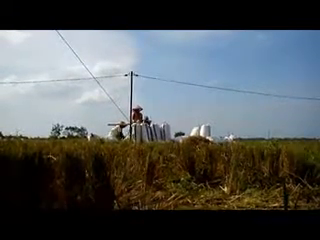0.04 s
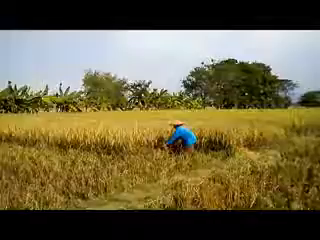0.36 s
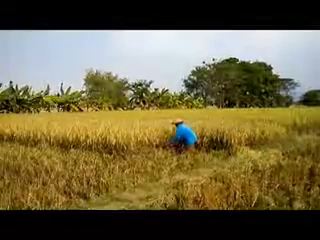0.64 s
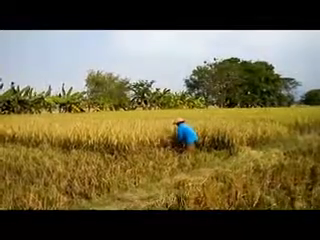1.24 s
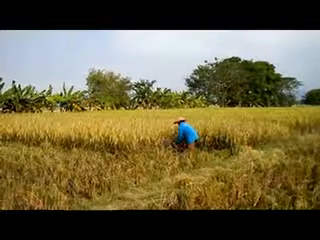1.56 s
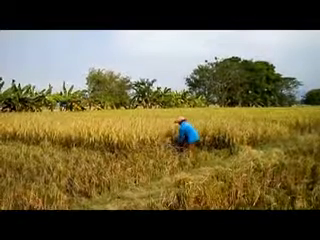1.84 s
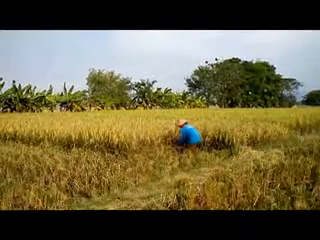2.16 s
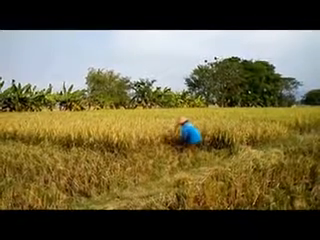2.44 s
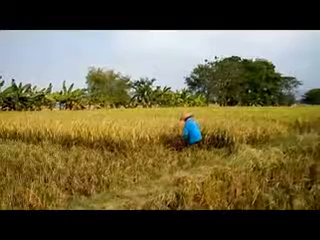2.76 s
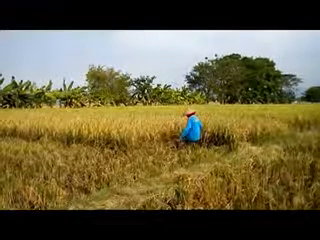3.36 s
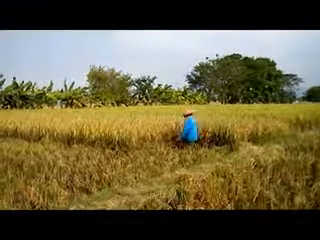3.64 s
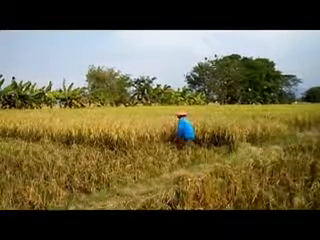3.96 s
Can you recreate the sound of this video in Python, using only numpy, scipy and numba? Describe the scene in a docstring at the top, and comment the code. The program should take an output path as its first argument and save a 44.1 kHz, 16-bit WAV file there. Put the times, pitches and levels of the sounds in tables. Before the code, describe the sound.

Gusts of wind rumble and thump directly on the microphone, outdoors in a ripe rice field. The wind starts light, then suddenly turns strong, with a soft hiss of dry stalks swelling behind it and one brief click.

```python
"""Wind over a ripe rice field.

A bare microphone stands first in a calmer spot, with two faint knocks far off, then in the open crop.
Gusts buffet it: large eddies rumble, small ones flutter, sharp ones thump, and the hardest gust hoots.
Dry husks and stalks brush together in slow swells, one stalk snaps and a far tone sounds at the end.
A limiter holds down the gusts; the sound drops out twice and breaks once with a click."""
import sys
import numpy as np
from scipy import signal
from scipy.fft import rfft, irfft
from scipy.io import wavfile
from scipy.ndimage import uniform_filter1d, map_coordinates
from numba import njit

SR = 44100
rng = np.random.default_rng(int(sys.argv[2]) if len(sys.argv) > 2 else 0)


def inscribe(sig):
    """Save sig as 16-bit PCM at rate SR to the path in sys.argv[1].

    A 1-D sig is mono; a 2-D sig holds one channel per row.
    Samples are clipped to [-1, 1] before scaling.
    """
    pcm = np.round(np.clip(np.atleast_2d(sig).T, -1, 1) * 32767)
    wavfile.write(sys.argv[1], SR, pcm.astype(np.int16))


N = 176400

# Wind, distant air and hiss at the calmer spot. Each row: frequency in Hz, relative level in dB.
CALM_WIND_COLOUR = [(20, -6), (50, 5.5), (105, 5), (160, -5.5), (220, -17.5), (300, -26), (700, -56)]
CALM_AIR_COLOUR = [(300, -7), (550, -3.5), (800, -3), (1050, 0.5), (1400, -9), (1950, -6), (2400, -8),
                   (3000, -3.5), (5000, -6.5), (14000, -9)]
CALM_HISS_COLOUR = [(1000, -11.5), (2500, -11.5), (4500, -14), (7000, -5), (8700, -11.5), (10200, 1.5),
                    (11500, -2.5), (13400, 4.5), (14400, -3.5)]
# The hiss growing there. Each row: time in seconds, level in dB.
CALM_HISS_LEVELS = [(0, -53), (.12, -53.5), (.21, -47.5), (.3, -50.5), (.39, -41), (.45, -43.5)]
# Knocks far off. Each row: centre in seconds, level in dB.
KNOCKS = [(0.028,-57.5),(.155,-57.5)]
# Their hollow ring. Each row: frequency in Hz, bandwidth in Hz, relative level in dB.
KNOCK_MODES = [(363,78,-13),(1040,61,-1.5),(1910,130,-7.5)]
# Gaps in the sound. Each row: start in seconds, end in seconds.
DROPOUTS = [(.445, .4775), (2.063, 2.084)]
# Large and small eddies on the microphone. Each row: time in seconds, relative level in dB.
RUMBLE_LEVELS = [(.48,-23.5),(.6,-30),(.66,-31),(.74,-29.5),(.8,-43),(.94,-43),(1.03,-28.5),(1.2,-29.5),(1.4,-24.5),(1.58,-29),(1.75,-28),(2.15,-31.5),(2.29,-23),(2.41,-31.5),(2.52,-27),(2.8,-26),(3.05,-27.5),(3.21,-31),(3.33,-30),(3.48,-33.5),(3.65,-31),(4.0,-32)]
FLUTTER_LEVELS = [(.48,-43),(.64,-52),(.73,-51),(.8,-64),(.97,-64),(1.05,-46.5),(1.25,-45),(1.4,-42),(1.46,-30.5),(1.62,-31.5),(1.7,-48),(1.86,-47),(1.93,-37.5),(2.18,-38),(2.33,-40),(2.49,-56),(2.66,-39.5),(2.83,-38),(3.05,-46.5),(3.21,-54.5),(3.36,-47.5),(3.5,-52.5),(3.7,-53),(4.0,-53)]
# Their spectra. Each row: frequency in Hz, relative level in dB.
RUMBLE_COLOUR = [(12, -33), (25, 1), (45, 1.5), (75, 0.5), (105, -1), (140, -5.5), (200, -12.5),
                 (300, -30.5), (600, -53), (1500, -104)]
FLUTTER_COLOUR = [(60, -65), (140, -2.5), (230, 3), (330, -6), (480, -14), (700, -23.5), (1000, -34.5),
                  (1500, -45.5), (4000, -89)]
# Single puffs and lulls. Each row: centre in seconds, half length in seconds, flutter change in dB.
PUFFS = [(0.516,0.038,6),(0.714,0.0093,2),(1.038,0.02,6.5),(1.195,0.017,6),(1.293,0.018,9.5),(1.445,0.0091,4.5),(1.625,.017,7.5),(1.791,0.018,8),(2.029,0.025,6),(2.154,0.013,8),(2.313,0.022,4.5),(2.642,0.013,4.5),(2.704,0.025,5),(2.793,0.011,4),(2.845,0.013,5.5),(3.025,0.011,6),(3.089,0.0097,6),(3.333,0.023,5.5),(3.424,0.015,9),(3.571,0.015,13),(3.623,0.021,15),(3.699,0.0097,5),(3.779,0.007,9),(3.82,0.017,13.5),(3.903,0.017,17)]
LULLS = [(.66,.015,-3),(1.675,.02,-3),(1.735,.016,-4),(2.08,.02,-5),(2.42,.022,-3),(2.99,.013,-4),(3.18,.01,-6),(3.24,.013,-4),(3.53,.016,-4),(3.73,.02,-4),(3.865,.015,-4),(3.99,.02,-8)]
# Fine husk hiss and coarser stalk rustle in the crop. Each row: time in seconds, level in dB.
HUSK_LEVELS = [(.48,-46),(.57,-51.5),(.78,-41.5),(1.04,-58.5),(1.22,-57),(1.4,-43),(1.56,-47.5),(1.72,-46.5),(1.98,-52),(2.17,-46),(2.36,-52),(2.52,-45.5),(2.72,-57),(3.15,-59.5),(3.27,-54.5),(3.56,-45),(3.9,-59),(4.0,-57.5)]
STALK_LEVELS = [(.48,-56),(.56,-64.5),(.76,-52.5),(.95,-62.5),(1.05,-66.5),(1.3,-64),(1.42,-58),(1.6,-60),(1.72,-57),(1.95,-64.5),(2.05,-60.5),(2.33,-63.5),(2.51,-55),(2.75,-72),(3.05,-69.5),(3.22,-62.5),(3.55,-60.5),(3.64,-64.5),(3.72,-58),(3.9,-66),(4.0,-59.5)]
# Husks, stalks and the open air far away. Each row: frequency in Hz, relative level in dB.
HUSK_COLOUR = [(1000,-12),(2500,-41),(3200,-15.5),(4000,-9.5),(4800,-2.5),(5900,5),(7000,0),(8000,4.5),(9200,3.5),(10300,-4.5),(11600,-4),(13300,2),(14400,-5.5)]
STALK_COLOUR = [(500,-15),(1300,-5),(1900,2.5),(2500,0),(3200,-6),(4300,-2),(6000,-24),(12000,-30)]
AIR_COLOUR = [(60, 13), (300, -8), (600, -7.5), (1000, 1.5), (1400, -21.5), (2000, -9), (3200, -40),
              (8000, -2.5), (14000, -31)]
# Sharp eddies right on the microphone. Each row: centre in seconds, peak in dB, pitch in Hz.
THUMPS = [(.4825,-17,160),(.502,-17,95),(.526,-18,100),(.553,-19,65),(.626,-22,85),(1.192,-24,260),(1.476,-16,230),(1.562,-17,250),(2.703,-17,150),(2.787,-17,170),(2.852,-16,105),(2.935,-18,115),(3.018,-17,150),(3.117,-18,140),(3.563,-18,155),(3.575,-17,100),(3.636,-20,170),(3.808,-17,105),(3.893,-18,100),(3.912,-18,130)]
# Clicks where the sound breaks or comes back. Each row: time in seconds, level in dB.
CLICKS = [(1.0843, -21), (2.0848, -34)]
# The crack of a dry stalk. Each row: frequency in Hz, relative level in dB.
SNAP_COLOUR = [(500, -28), (1300, -12.5), (2000, 1), (2800, 0), (3800, -23), (9000, -29)]


def undb(db):
    """Decibels to gain."""
    return 10 ** (np.asarray(db) / 20)


def curve(rows):
    """Rows of (seconds, value) joined by straight lines."""
    rows = np.array(rows)
    return np.interp(np.arange(N) / SR, rows[:, 0], rows[:, 1])


def bump(t, at, half):
    """A bell curve of height 1, down to 1/e at `half` seconds either side of `at`."""
    return np.exp(-((t - at) / half) ** 2)


def coloured(x, colour):
    """Gives x a spectrum of (Hz, dB) points, at rms 1."""
    points = np.array(colour)
    hz = np.maximum(np.arange(len(x) // 2 + 1) * SR / len(x), 1)
    db = np.interp(np.log(hz), np.log(points[:, 0]), points[:, 1])
    shaped = irfft(rfft(x) * undb(db) * np.minimum(hz / 20, 1), len(x))
    return shaped / np.std(shaped)


def noise(colour):
    """Noise of a given colour, at rms 1."""
    return coloured(rng.standard_normal(N), colour)


def wander(per_s):
    """Smooth random wander with a spread of 1."""
    position = np.arange(N) / SR * per_s
    path = map_coordinates(rng.standard_normal(size=4096), [position], order=3, mode="wrap")
    return path / np.std(path)


def steadied(x, size):
    """Evens out chance swells over `size` samples, so that the wind alone sets the level."""
    return x / np.sqrt(uniform_filter1d(uniform_filter1d(x ** 2, size), size) + 1e-9)


def leaves(colour, grain_db=1, flicker_db=1):
    """Countless tiny contacts of dry leaves and husks merge into a fine hiss."""
    contacts = rng.standard_normal(N) * undb(grain_db * wander(900))
    return coloured(contacts, colour) * undb(flicker_db * wander(25.26))


def calm_spot(wind_db=-43.5, air_db=-57.5):
    """Light wind rumbles on the microphone, over distant air and a thin, growing hiss of leaves."""
    wind = steadied(noise(CALM_WIND_COLOUR), size=2400) * undb(wind_db)
    air = noise(CALM_AIR_COLOUR) * undb(air_db)
    return wind + air + leaves(CALM_HISS_COLOUR) * undb(curve(CALM_HISS_LEVELS))


def far_knocks(t, half_s=.04):
    """Hollow knocks, blurred by distance: noise rings three resonances in two short swells."""
    ring = np.zeros(N)
    for hz, width, db in KNOCK_MODES:
        resonance = signal.iirpeak(hz, hz / width, fs=SR)
        ring += undb(db) * signal.lfilter(*resonance, rng.standard_normal(N))
    return ring / np.std(ring) * sum(undb(db) * bump(t, at, half_s) for at, db in KNOCKS)


def buffeting(t, rumble_gain_db=1, flutter_gain_db=6, octaves_per_db=-.01, reference_db=-38):
    """Eddies press on the bare microphone: large, slow ones rumble and small, fast ones flutter."""
    puff_db = sum(db * bump(t, at, half) for at, half, db in PUFFS)
    rumble_db = curve(RUMBLE_LEVELS) + .59 * puff_db + 1.5 * wander(24)
    rumble = steadied(noise(RUMBLE_COLOUR), size=1500) * undb(rumble_db + rumble_gain_db)
    flutter_db = curve(FLUTTER_LEVELS)
    # The flutter sinks slightly in pitch as it grows louder.
    speed = 2 ** (octaves_per_db * (flutter_db + .499 * puff_db - reference_db))
    eddies = map_coordinates(noise(FLUTTER_COLOUR), [np.cumsum(speed)], order=3, mode="mirror")
    roughness = undb(3.5 * wander(110))
    flutter = steadied(eddies * roughness, size=1100)
    return rumble + flutter * undb(flutter_db + puff_db + flutter_gain_db)


def buffeting_dips(t, cover_db=-3, cover_half_s=.008):
    """The buffeting sinks in the lulls and gives way while a sharp eddy covers the microphone."""
    lull_db = sum(db * bump(t, at, half) for at, half, db in LULLS)
    covered = sum(bump(t, at, cover_half_s) for at, _, _ in THUMPS)
    return undb(lull_db + cover_db * covered)


def rice_crop(husk_floor_db=-58.3, air_db=-62.5):
    """Husks hiss and stalks rustle, swelling and settling over the distant air, never quite still."""
    husks = leaves(HUSK_COLOUR) * np.hypot(undb(curve(HUSK_LEVELS)), undb(husk_floor_db))
    stalks = leaves(STALK_COLOUR) * undb(curve(STALK_LEVELS))
    return husks + stalks + noise(AIR_COLOUR) * undb(air_db)


def eddy_thumps(t):
    """Each sharp eddy pushes and pulls on the microphone once; smaller ones pass faster, sound higher."""
    pressure = np.zeros(N)
    for at, db, hz in THUMPS:
        skew = np.exp(2j * np.pi * rng.random())  # lopsided by chance
        pressure += undb(db) * np.real(skew / (1 - 1j * np.pi * hz * (t - at)) ** 3)
    return pressure


def clicks(t, rise_s=.0014, top_hz=3500):
    """A rising pressure wave is cut off short, which gives a dull click."""
    steps = sum(undb(db) * (t < at) * np.exp(-np.abs(t - at) / rise_s) for at, db in CLICKS)
    return signal.lfilter(*signal.butter(1, top_hz, fs=SR), steps)


def vortex_hoot(t, at=1.629, half_s=.016, db=-20, centre_hz=350, rise_hz_per_s=1500, jitter=.1):
    """In the hardest gust, vortices leave the edge of the microphone unevenly and ever faster."""
    hz = (centre_hz + rise_hz_per_s * (t - at)) * (1 + jitter * wander(250))
    phase = 2 * np.pi * np.cumsum(hz) / SR
    vortices = np.sin(phase) + np.sin(phase / 2)  # they pair up, which adds the octave below
    return undb(db) * bump(t, at, half_s) * vortices


def stalk_snap(t, at=3.73, db=-42, decay_s=.003):
    """One dry stalk cracks out in the crop: a burst of noise that dies at once."""
    age = t - at
    return noise(SNAP_COLOUR) * undb(db) * (age >= 0) * np.exp(-np.abs(age) / decay_s)


def far_tone(t, start_s=3.93, rise_s=.03, hz=491, rms_db=-53, waver=.006):
    """A faint, slightly wavering tone fades in far away, under the last gust."""
    phase = 2 * np.pi * np.cumsum(hz * (1 + waver * wander(30.9))) / SR
    fade_in = np.clip((t - start_s) / rise_s, 0, 1)
    return np.sqrt(2) * undb(rms_db) * np.sin(phase) * fade_in


@njit
def follow_peaks(x, attack_s, release_s):
    """The limiter's peak follower, with a fast rise and a slow fall."""
    attack, release = 1 / (attack_s * SR), 1 / (release_s * SR)
    peaks, level = np.empty(len(x)), 0.
    for i in range(len(x)):
        size = abs(x[i])
        level += (size - level) * (attack if size > level else release)
        peaks[i] = level
    return peaks


def scene():
    """One microphone, two places: the calmer spot, then out in the gusty field."""
    t = np.arange(N) / SR
    cut_s = .46
    wind = buffeting(t) * buffeting_dips(t) + eddy_thumps(t) + vortex_hoot(t)
    field = wind + rice_crop() + stalk_snap(t) + clicks(t) + far_tone(t)
    return np.where(t < cut_s, calm_spot() + far_knocks(t), field)[None]


def record(dry):
    """A limiter ducks under the gusts, peaks are rounded, the sound drops out twice, the top is cut."""
    t = np.arange(N) / SR
    limit_db, ceiling_db, dropout_db, top_hz = -17, -13, -37, 14350
    peaks = follow_peaks(dry[0], attack_s=.0015, release_s=.02)
    limited = dry / np.maximum(1, uniform_filter1d(peaks, size=200) / undb(limit_db))
    rounded = limited / (1 + (limited / undb(ceiling_db)) ** 6) ** (1 / 6)
    in_gap = sum((t > start) & (t < end) for start, end in DROPOUTS)
    gap_gain = uniform_filter1d(1. - (1 - undb(dropout_db)) * in_gap, size=24)
    lowpass = signal.ellip(10, .2, 80, top_hz, fs=SR, output="sos")
    return signal.sosfilt(lowpass, rounded * gap_gain)


dry = scene()
out = record(dry)
inscribe(out)
```